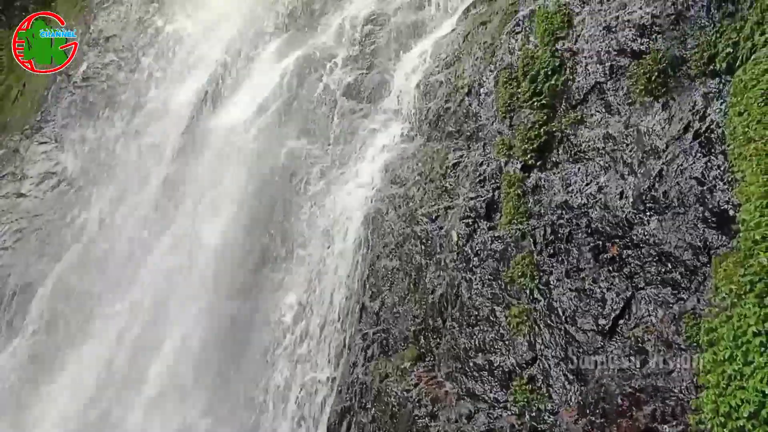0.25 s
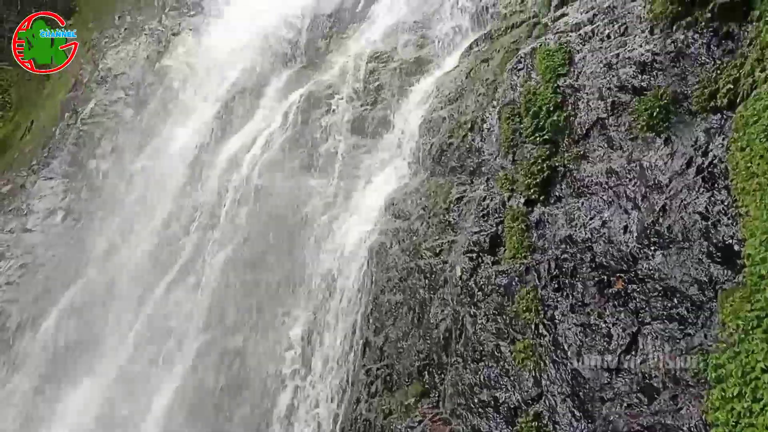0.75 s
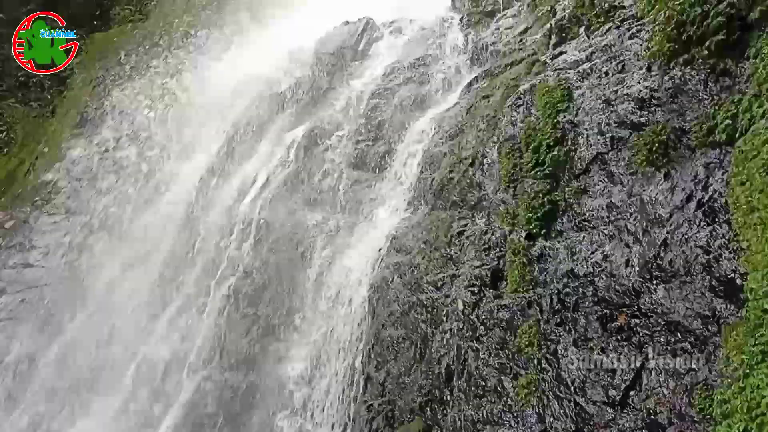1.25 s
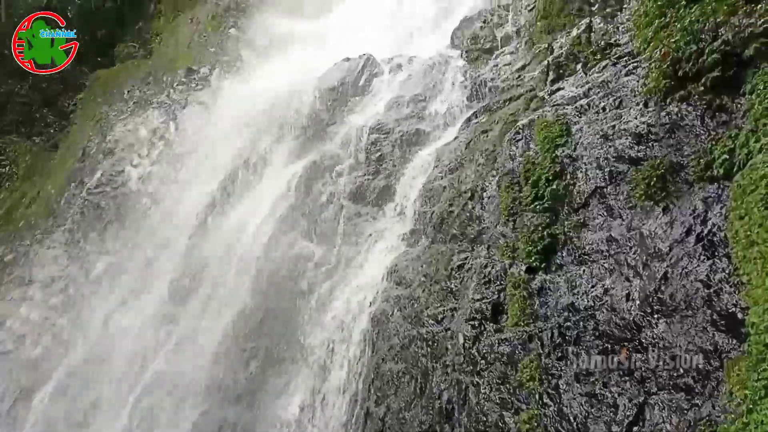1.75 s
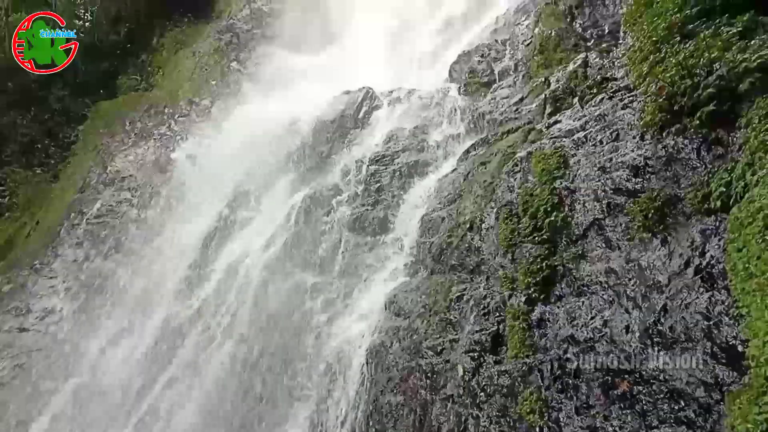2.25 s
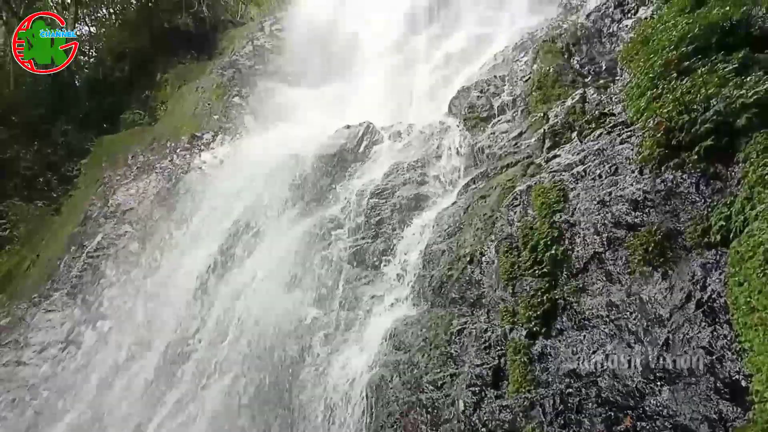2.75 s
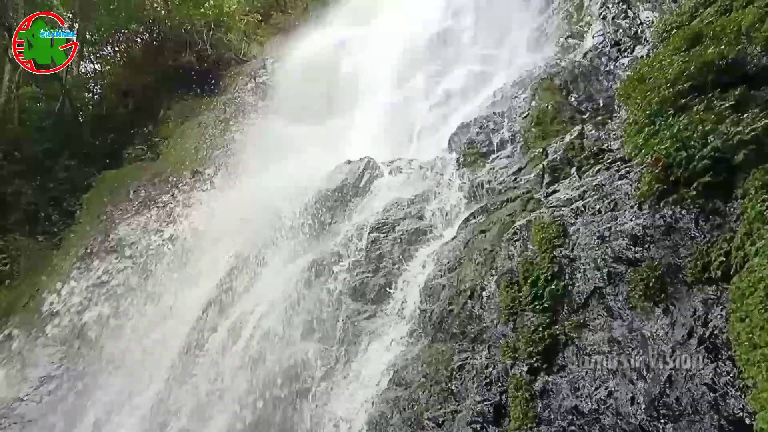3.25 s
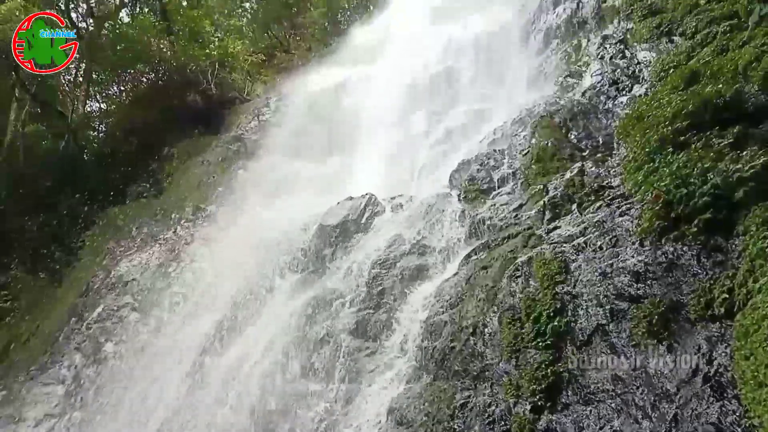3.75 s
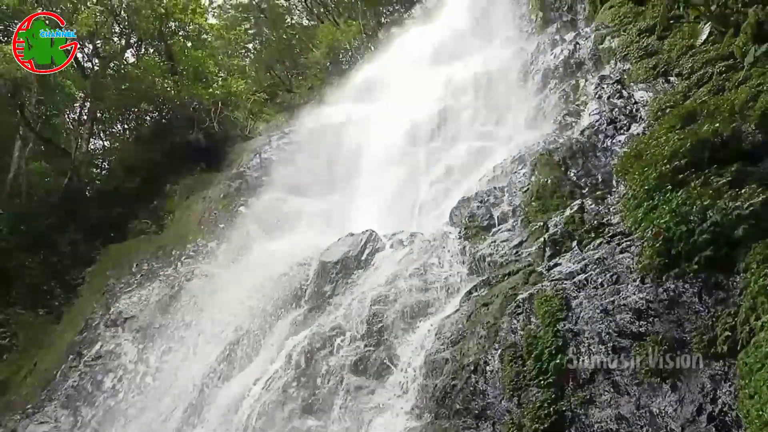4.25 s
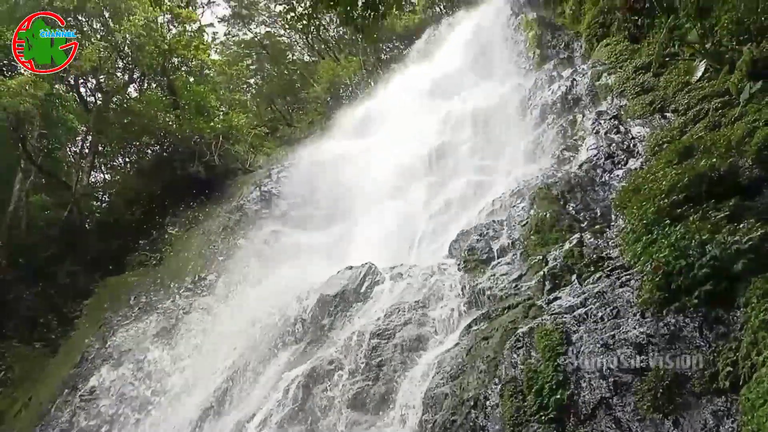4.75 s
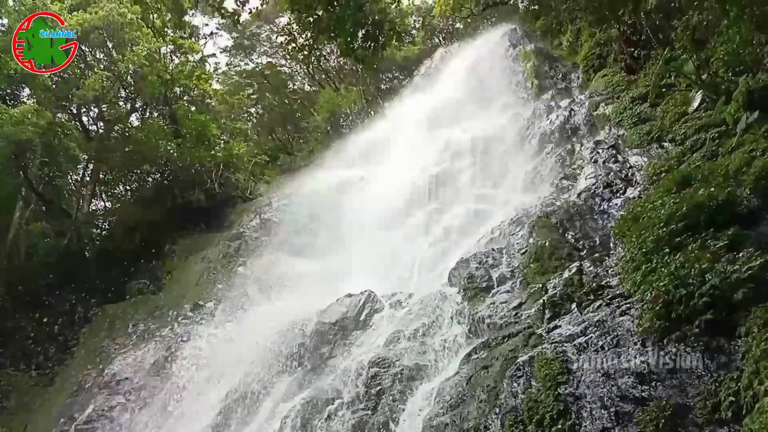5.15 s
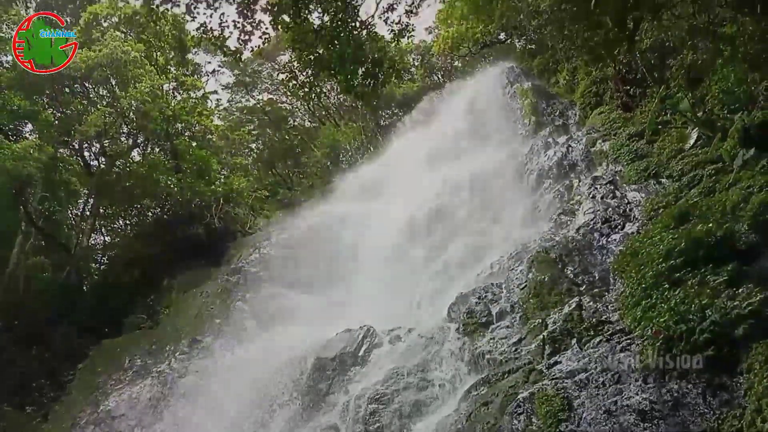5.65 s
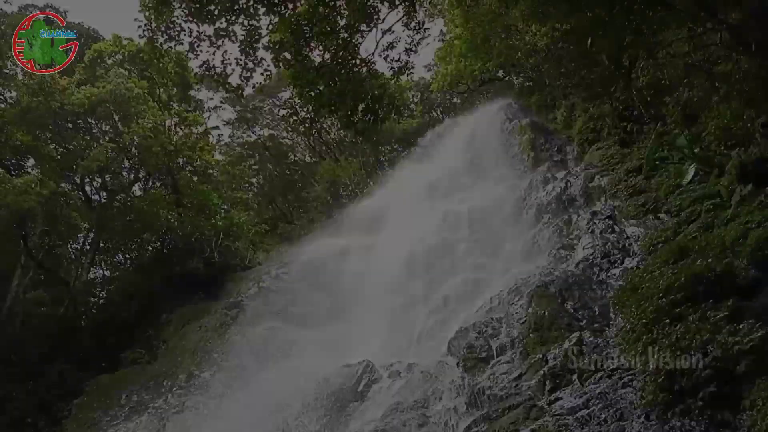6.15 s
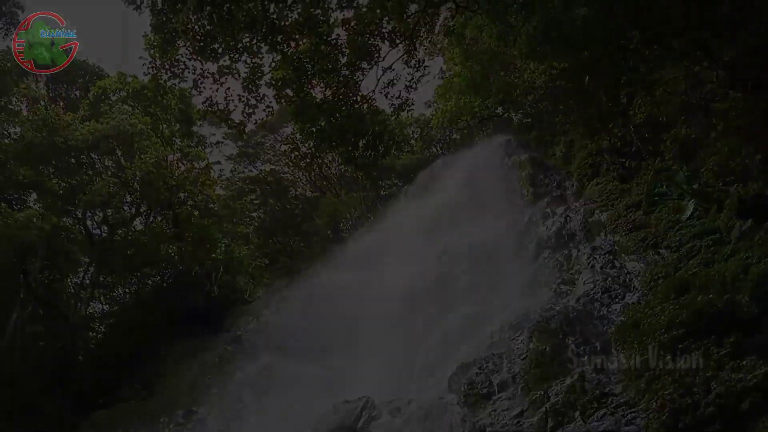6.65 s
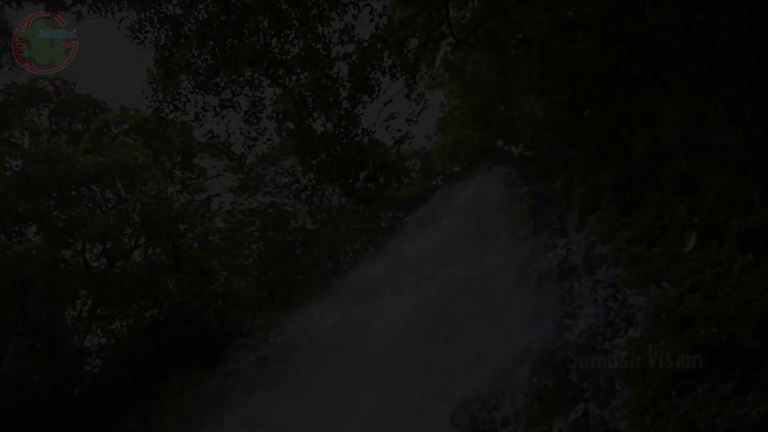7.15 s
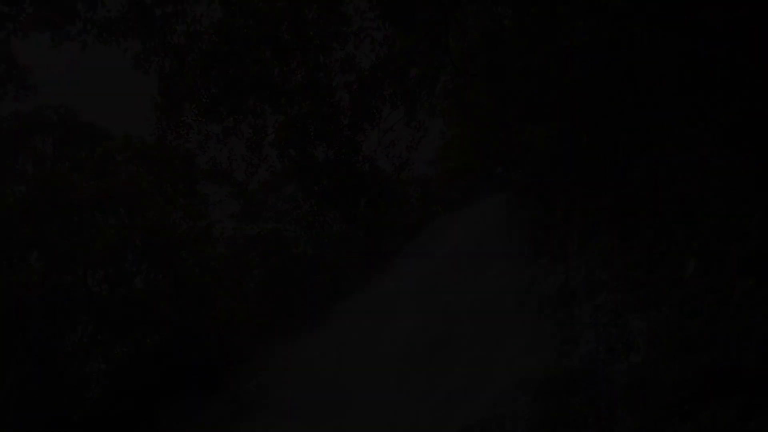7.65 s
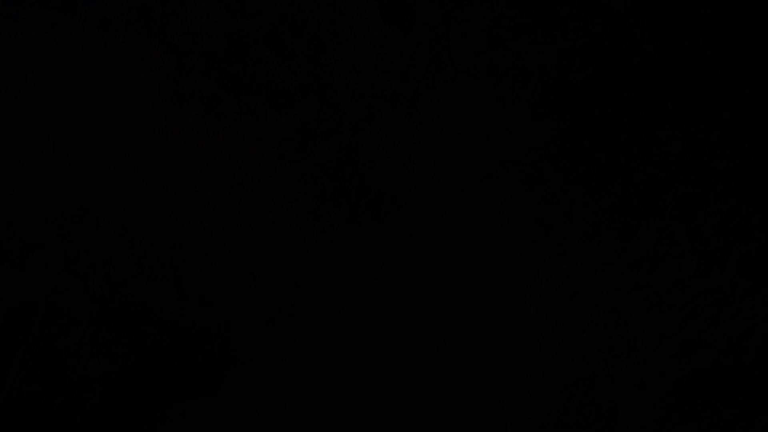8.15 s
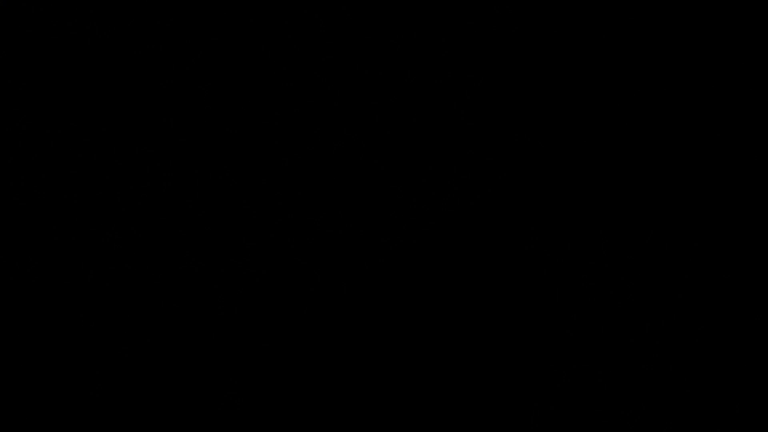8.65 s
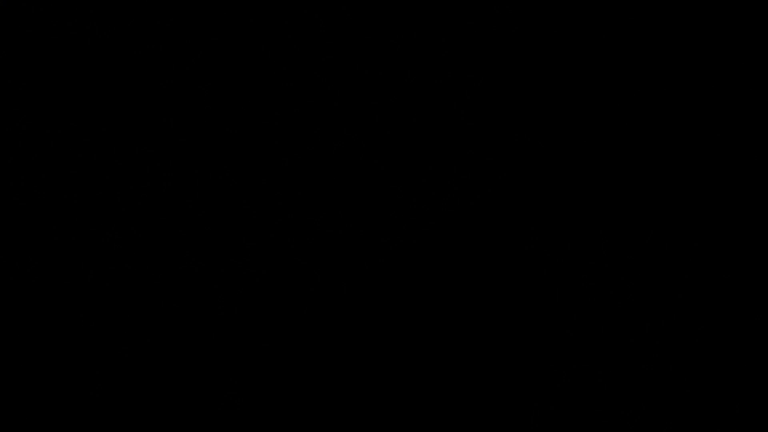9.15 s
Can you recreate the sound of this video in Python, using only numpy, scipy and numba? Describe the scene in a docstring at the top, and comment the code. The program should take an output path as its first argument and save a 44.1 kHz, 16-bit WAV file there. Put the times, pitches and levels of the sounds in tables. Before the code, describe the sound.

Continuous heavy rush of a waterfall, thick and noisy like broadband static, with countless tiny bubbles blended into it and no separate splashes. The sound leans strongly right, where it is crisp; the left carries only a dull, hollow, slightly delayed version. Wind-like low buffeting stirs gently below. The level holds, then sinks smoothly away to complete silence near the end.

```python
"""A tall waterfall pours onto rock: bands of noise make its dense roar, with faint ringing bubbles and fine spray.
The right microphone port is open and bright. The left one is covered, so it is dull and late,
and the air under its cover adds a hollow boom made of noise passed through three resonances.
Low rumble buffets both ports, and a few dying sines thump them as dull knocks.
The sound is faded out to silence, in small notches at the end."""
import sys
import numpy as np
from scipy import signal
from scipy.fft import rfft, irfft
from scipy.io import wavfile
from scipy.ndimage import uniform_filter1d
from numba import njit

SR = 44100
rng = np.random.default_rng(int(sys.argv[2]) if len(sys.argv) > 2 else 0)


def file_out(sig):
    """Save sig as 16-bit WAV at sys.argv[1]."""
    # one column per channel
    cols = np.atleast_2d(sig).T
    # limit, then scale
    lim = np.clip(cols, -1, 1)
    pcm = np.round(lim * 32767).astype(np.int16)
    wavfile.write(sys.argv[1], SR, pcm)


N = 414981

# How strong the fall is, before scene() doubles it.
# Each row: time in seconds, roar level in dB, level in dB of the boom in the covered port.
FALL_LEVELS = [(0, -26, -39.5), (.45, -25.8, -40.5), (.85, -26.5, -43), (1.4, -26.5, -41.5),
               (1.8, -26.5, -39), (2.15, -26, -42), (2.9, -26, -43), (3.4, -26.5, -41.5), (4.1, -26, -40),
               (4.6, -26, -38), (5.05, -26, -41.5), (5.7, -26, -41.5), (6.4, -26.5, -38.5), (7, -26.5, -43),
               (8.1, -26, -38.5), (8.6, -26.5, -38)]
# Tone of the water at the open port. Each row: frequency in Hz, filter gain in dB.
OPEN_PORT_TONE = [(20, -37), (60, -18), (90, -12), (220, -3.5), (400, -3), (700, -1.5), (1000, -4),
                  (1500, -3), (2650, 0.5), (4500, -7.5), (6300, -1), (6450, -10.5), (7600, -23.5),
                  (7800, -17.5)]
# Tone of the fine spray. Each row: frequency in Hz, filter gain in dB.
SPRAY_TONE = [(6500, -37), (7800, 0), (9500, -4.5), (12500, -7.5), (15500, -6.5)]
# What the covered port lets through. Each row: frequency in Hz, filter gain in dB.
COVERED_PORT_TONE = [(20, -28), (33, -15), (62, -6), (130, -9.5), (260, -5), (330, -9), (600, -1),
                     (850, -6.5), (1600, -12.5), (2200, -14.5), (3850, -29), (4050, -51), (5700, -45.5),
                     (8500, -66), (11500, -55.5), (14500, -70.5)]
# How much the two ports have in common.
# Each row: frequency in Hz, share (0 to 1) of the covered port's power that is the open port's water.
SHARED_POWER = [(60, .05), (130, .2), (300, .8), (550, .7), (800, .35), (1000, .18), (2200, .05), (4000, 0)]
# Resonances of the air under the cover. Each row: frequency in Hz, width in Hz, gain in dB.
CAVITY_MODES = [(167, 25, -2), (200.3, 36, 3.5), (393, 50, -6.5)]
# Short low knocks, before the low cut and the fade.
# Each row: start in seconds, level in dB, share in the left port (0 to 1), pitch in Hz, decay time in seconds.
KNOCKS = [(1.495, -23, 0, 95, 0.014), (1.553, -27, 0, 120, .01), (8.284, -14, 1, 130, 0.014),
          (8.337, -13, 1, 95, .014)]
# Near silence the fader moves in notches and rests in between. Each entry: time of a notch in seconds.
FADER_NOTCHES_S = [8.08, 8.243, 8.358, 8.43, 8.527, 8.593, 8.62]

BUBBLE_DB = -11  # against the rush of the water
ROAR_MEAN_DB, SPRAY_DB = -26.5, -21.5  # a usual roar level, and the spray against the roar at that level
SPRAY_PER_DB = 1.5  # extra dB of spray for each dB of roar
COVERED_DB = -15.5  # covered port against the water at the open one
LEFT_LAG_S, COVER_HZ = 0.0002, 606  # fixed delay, and where the cover's own phase lag reaches 45 degrees
RUMBLE_HZ, RUMBLE_SWELL_DB, GUST_DB = 125, 1.1, 2.2  # top of the rumble, swell in both ports, gusts in each
END_S, FADE_S, FADE_POWER = 8.63, 4.7, 1.446  # end and length of the fade, and its bend
NOTCH_S = .005  # time that one notch takes
TOP_HZ = 15460

T = np.arange(N) / SR  # time in seconds
HZ = np.maximum(np.arange(N // 2 + 1) * SR / N, 1)  # frequencies of the spectrum


def churn(surge_db, flicker_db):
    """White rush in octave bands: sheets of water surge together, each band flickers alone."""
    rush = rfft(rng.standard_normal(N))
    surge = walk(9)
    out = np.zeros(N)
    for octave in np.arange(4, 16):  # centres at 2 ** octave Hz
        band = np.clip(1 - np.abs(np.log2(HZ) - octave), 0, 1)
        level_db = surge_db * surge + flicker_db * walk(14)
        out += irfft(rush * band, N) * undb(level_db)
    return unit(out)


def bubbles(count=30000):
    """Air trapped by the plunge rings briefly; so many bubbles that none stands out."""
    when, pitch, big = rng.random((count, 3)).T
    hz = 250 + 6500 * pitch
    size = undb(10 * big) * np.sqrt(hz)
    start = (when * N).astype(np.int64)
    return unit(ring(start, hz, size, 6., 0.086))


@njit
def ring(start, hz, size, cycles, glide):
    """Each bubble is a dying sine whose pitch slides up."""
    out = np.zeros(N + 8192)  # room for the last bubbles to die away
    for k in range(len(start)):
        decay = min(cycles * SR / hz[k], 2000.)  # in samples
        phase = 0.
        for i in range(int(4 * decay)):
            phase += 2 * np.pi * hz[k] * (1 + glide * i / decay) / SR
            out[start[k] + i] += size[k] * np.exp(-i / decay) * np.sin(phase)
    return out[:N]


def fine_spray():
    """Fine spray is a hiss: churning noise that keeps only its treble."""
    gain = undb(along(SPRAY_TONE)) * (HZ > 6500)
    return unit(shaped(churn(.5, .7), gain))


def open_port(water, roar_db):
    """The open port hears the water up to 7800 Hz, plus spray that grows faster than the roar."""
    roar = unit(shaped(water, undb(along(OPEN_PORT_TONE)) * (HZ < 7800)))
    spray_db = SPRAY_DB + SPRAY_PER_DB * (roar_db - ROAR_MEAN_DB)
    return roar + undb(spray_db) * fine_spray()


def covered_port(water):
    """The covered port hears the water late and dull, mixed with rush that comes through the body."""
    share = np.clip(along(SHARED_POWER), 0, 1)
    lag = 2 * np.pi * HZ * LEFT_LAG_S + np.arctan(HZ / COVER_HZ)  # in radians
    late = shaped(water, np.sqrt(share) * np.exp(-1j * lag))
    body = shaped(churn(.4, .8), np.sqrt(1 - share))
    return undb(COVERED_DB) * unit(shaped(late + body, undb(along(COVERED_PORT_TONE))))


def buffet(ports):
    """The lowest rumble swells in both ports together and buffets each one in quick gusts."""
    gust_db = RUMBLE_SWELL_DB * walk(5.5) + GUST_DB * np.array([walk(22), walk(22)])
    low = shaped(ports, 1 / (1 + (HZ / RUMBLE_HZ) ** 6))
    return ports + (undb(gust_db) - 1) * low


def cavity():
    """The roar shakes the air under the cover, which booms unevenly at its modes."""
    gain = 0
    for hz, width, db in CAVITY_MODES:
        gain = gain + undb(db) / (1 + (2 * (HZ - hz) / width) ** 2)
    return unit(shaped(churn(.5, 1.2), gain))


def knocks():
    """Dull thuds of wind or handling: low sines that die away within a few cycles."""
    out = np.zeros((2, N))
    for s, db, left, hz, decay_s in KNOCKS:
        age = np.maximum(T - s, 0)
        share = np.clip(left, 0, 1)
        thud = undb(db) * np.exp(-age / decay_s) * np.sin(2 * np.pi * hz * age)
        out -= np.outer([share, 1 - share], thud)  # the first swing is downward
    low_cut = signal.butter(2, 45, "high", fs=SR, output="sos")
    return signal.sosfilt(low_cut, out)


def undb(db):
    """Turn dB into gain."""
    return 10 ** (np.asarray(db) / 20)


def unit(x):
    """Scale to an average (rms) level of 1."""
    return x / np.sqrt(np.mean(x ** 2))


def along(table):
    """Read a table of Hz and value at every frequency, in straight lines on a log axis."""
    hz, value = np.transpose(table)
    return np.interp(np.log(HZ), np.log(hz), value)


def shaped(x, gain):
    """Filter by a gain for every frequency."""
    return irfft(rfft(x) * gain, N)


def walk(rate):
    """Random levels, rate of them each second, smoothed twice; average 0 and spread 1."""
    k = int(SR / rate)
    steps = np.repeat(rng.standard_normal(N // k + 1), k)
    w = uniform_filter1d(uniform_filter1d(steps, k), k)[:N]
    return (w - w.mean()) / w.std()


def fader():
    """A quarter-sine fade to silence, bent by a power and held between the last notches."""
    last_notch = np.searchsorted(FADER_NOTCHES_S, T, "right") - 1
    held_s = np.where(T < FADER_NOTCHES_S[0], T, np.take(FADER_NOTCHES_S, last_notch))
    left = np.clip((END_S - held_s) / FADE_S, 0, 1)  # part of the fade still to come
    gain = np.sin(np.pi / 2 * left) ** FADE_POWER
    return uniform_filter1d(gain, max(int(NOTCH_S * SR), 1)) * (T < END_S)


def scene():
    """The fall at the two ports, left then right, with the boom and the knocks."""
    s, *columns = np.transpose(FALL_LEVELS)
    roar_db, boom_db = (np.interp(T, s, c) for c in columns)
    water = unit(churn(0.25, 0.5) + undb(BUBBLE_DB) * bubbles())
    right = open_port(water, roar_db)
    left = covered_port(water)
    ports = buffet(np.array([left, right])) * undb(roar_db)
    ports[0] += undb(boom_db) * cavity()
    # the table gives the mean of both ports; roar and boom each mainly fill one, so they are doubled
    return 2 * ports + knocks()


def record(dry):
    """The sound is faded out and its top is cut."""
    top_cut = signal.ellip(14, .2, 80, TOP_HZ, fs=SR, output="sos")
    return signal.sosfilt(top_cut, dry * fader())


dry = scene()
out = record(dry)
file_out(out)
```